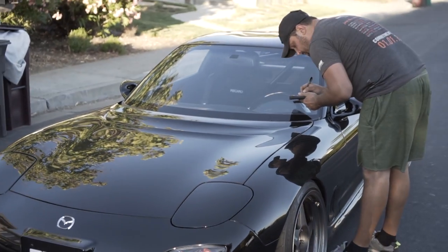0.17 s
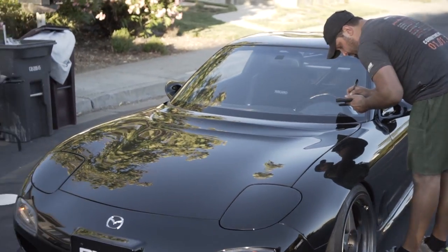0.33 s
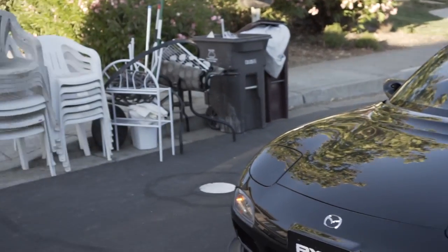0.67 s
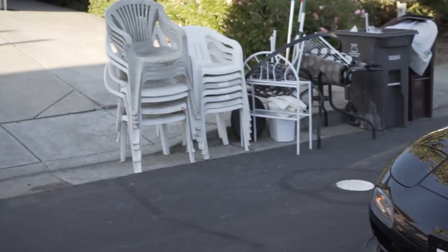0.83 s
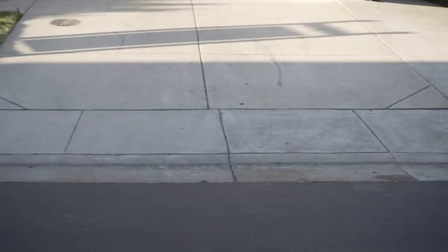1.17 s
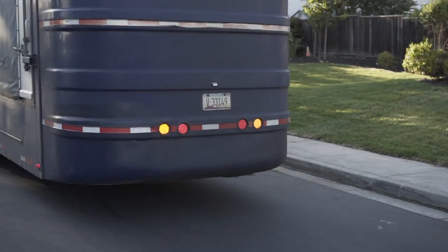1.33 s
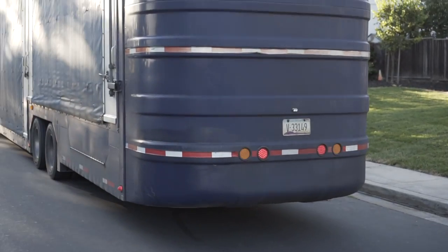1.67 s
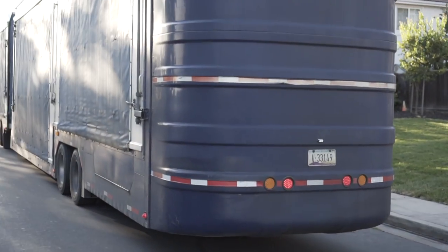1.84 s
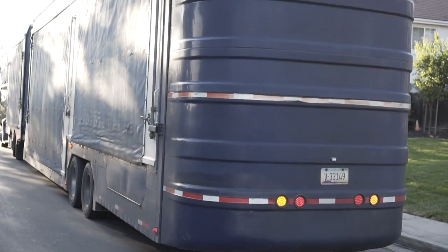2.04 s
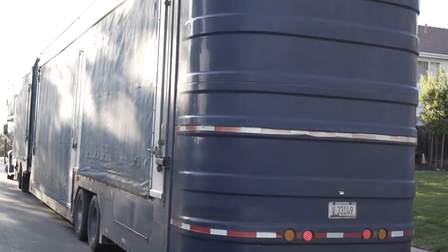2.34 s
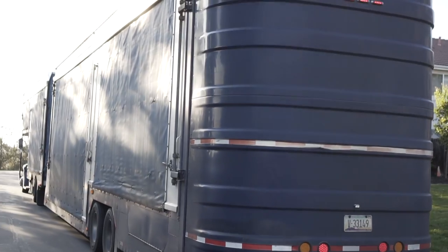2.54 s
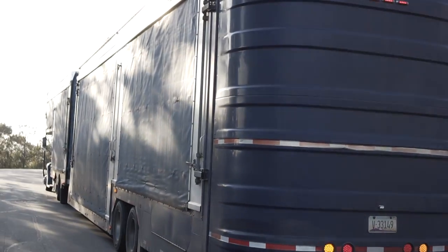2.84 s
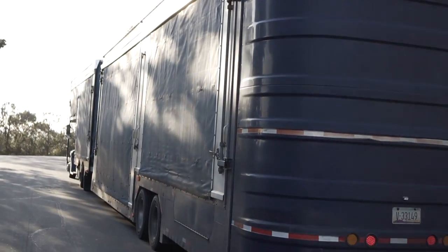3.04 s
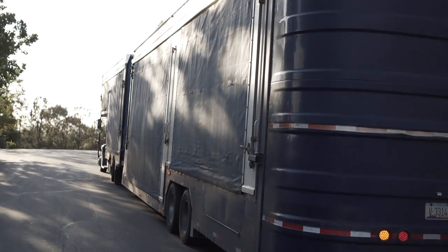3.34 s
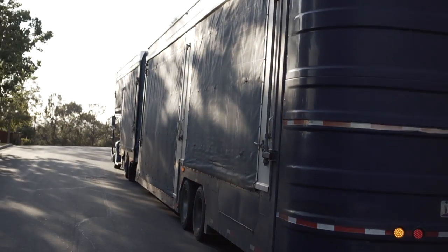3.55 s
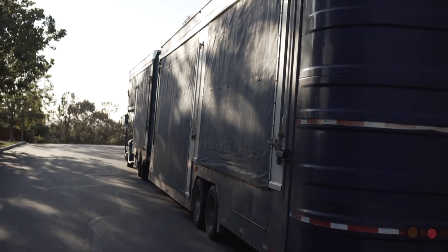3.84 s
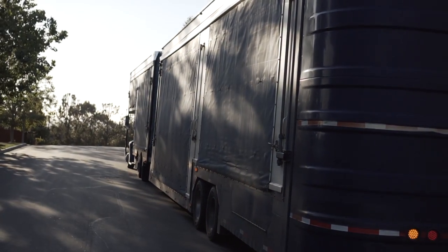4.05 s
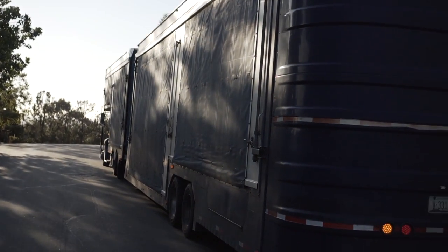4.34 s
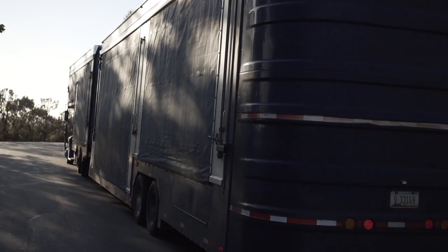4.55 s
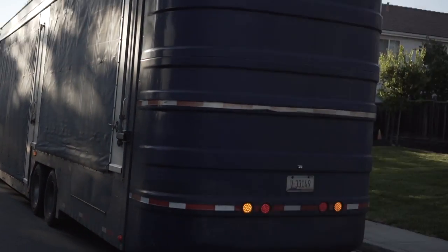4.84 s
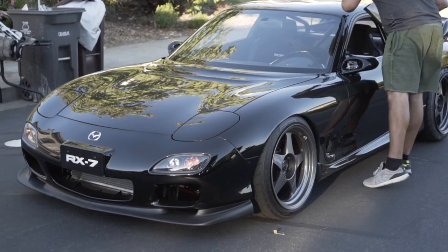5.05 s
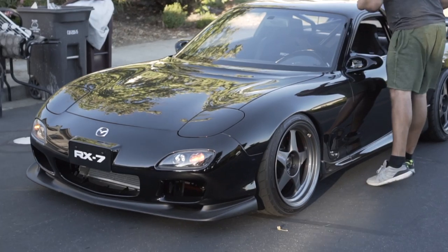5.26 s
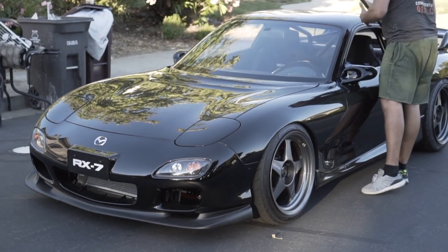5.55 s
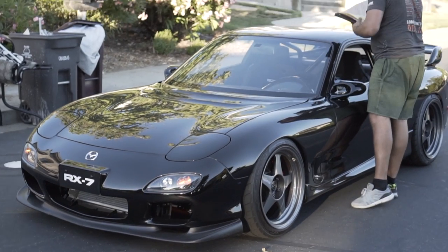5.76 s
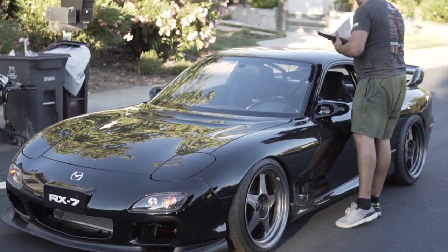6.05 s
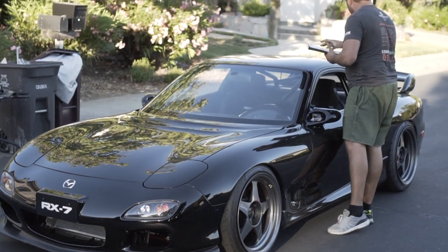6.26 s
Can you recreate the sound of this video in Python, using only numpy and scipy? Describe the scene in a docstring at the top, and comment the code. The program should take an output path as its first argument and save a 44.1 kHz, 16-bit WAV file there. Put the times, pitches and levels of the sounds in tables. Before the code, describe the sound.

A lumpy, throbbing car idle cuts to a clattering diesel truck running, then back again, as wind rumbles throughout.

```python
"""A rotary-engined sports car idles on a quiet street, its exhaust swelling in braps about seven times
a second: rotor firings boom in the pipe, gas burbles after them and the engine bay whirrs and hisses.
An abrupt cut moves to the back of a car transporter: diesel clatter, fan tones and a generator's hum,
the car still throbbing behind. A second cut returns to the car with a faint tick.
Wind rumbles on the microphone throughout."""
import sys
import numpy as np
from scipy import signal
from scipy.fft import rfft, irfft, next_fast_len
from scipy.io import wavfile
from scipy.ndimage import uniform_filter1d, minimum_filter1d

SR = 44100
rng = np.random.default_rng(int(sys.argv[2]) if len(sys.argv) > 2 else 0)


def wav_record(signal):
    """Record a signal, one row per channel, as 16-bit PCM in the file named by sys.argv[1]."""
    frames = np.transpose(np.atleast_2d(signal))
    bounded = np.clip(frames, -1, 1)
    # unit amplitude maps onto the largest positive 16-bit level
    quanta = np.round(bounded * 32767).astype(np.int16)
    wavfile.write(sys.argv[1], SR, quanta)


N = 282681
TIME = np.arange(N) / SR
TO_TRUCK_S, TO_CAR_S = 1.335, 5.087
LULL_FIRING_HZ = 57.6   # the rotary sags to this rate between braps

# Braps of the hunting idle beside the car. Each row: peak time in seconds, boom in relative dB,
# top firing rate in Hz, length in seconds, burble in relative dB.
BRAPS = [(0.0, -7, 60.4, 0.03, -35), (0.118, -11, 60, 0.073, -32), (0.282, -9.5, 63.6, 0.061, -35),
         (0.437, -8.5, 65, .085, -45), (0.584, -8.5, 63.7, 0.088, -27), (0.757, -11.5, 61, 0.11, -31),
         (0.88, -10.5, 61, 0.064, -25), (1.029, -11, 66, .06, -51), (1.169, -15, 67, 0.065, -38),
         (1.302, -12.5, 64, .06, -35), (5.202, -14, 56, 0.046, -25.5), (5.379, -18, 64, 0.059, -30.5),
         (5.51, -27.5, 60, 0.068, -27.5), (5.65, -12, 60, 0.084, -26.5), (5.801, -13.5, 63, 0.083, -27.5),
         (5.932, -11.5, 62, 0.061, -29.5), (6.091, -20, 58, 0.072, -30), (6.218, -15.5, 61, 0.056, -34),
         (6.373, -17, 61, 0.068, -30)]
# Exhaust pipe resonances. Each row: pitch in Hz, width in Hz, relative level in dB.
PIPE_MODES = [(125.3, 21.4, 29), (88, 35, -19), (201, 16, -27)]
# Moving around the bonnet. Each row: time in seconds, whirr in dB, hiss in dB.
BAY_LEVELS = [(0.0, -37, -45), (0.6, -38, -46.5), (1.15, -41.5, -48.5), (5.1, -38.5, -48.5),
              (5.4, -38.5, -49.5), (5.8, -37.5, -47.8), (6.41, -41.5, -51.5)]
# Tone colours of the car's noises. Each row: frequency in Hz, relative density in dB.
BURBLE_COLOUR = [(72, -17), (95, 5.5), (150, 3.5), (190, -1.5), (225, -2), (262, -8.5), (320, -6),
                 (390, -14.5), (550, -22.5), (900, -48)]   # exhaust gas
WHIRR_COLOUR = [(400, -7.5), (520, -6.5), (680, -10), (1100, -13.5), (1450, -17), (2100, -18.5),
                (2700, -18), (3450, -18.5), (4000, -26.5), (4600, -32)]   # engine bay
HISS_COLOUR = [(3700, -3), (4000, -3.5), (4450, -2), (5300, -7), (6000, -8), (6700, -6), (8300, -5.5),
               (9300, -11.5), (10200, -14.5), (12300, -13), (14000, -18), (15600, -23)]   # intake air

# Strength of the wind. Each row: time in seconds, relative level in dB.
BREEZE_LEVELS = [(0.0, -20), (0.45, -14.5), (0.7, -12), (1.22, -10.5), (1.42, -18.5), (1.62, -14.5),
                 (1.8, -26), (2.25, -20.5), (3.3, -19), (4.1, -22.5), (4.5, -15), (5.02, -23.5), (5.1, -11),
                 (5.75, -14), (5.97, -11), (6.41, -11)]
# Gusts that buffet the microphone. Each row: peak time in seconds, level in dB, length in seconds.
GUSTS = [(0.087, -21.5, 0.23), (0.656, -15.5, 0.11), (0.976, -16.5, 0.18), (1.25, -20, .15),
         (5.152, -16, 0.21), (5.38, -17.5, .12), (5.637, -17.5, 0.34), (5.9, -11, .15), (6.21, -15, .16)]
# Tone colours of the wind. Each row: frequency in Hz, relative density in dB.
PUSH_COLOUR = [(5, 2.5), (12, -1.5), (21, 1.5), (34, -10), (48, -21)]   # large eddies
BUFFET_COLOUR = [(38, 0), (52, 6), (66, 1), (85, 0.5), (130, -8), (300, -33)]   # small eddies

# Walking along the transporter. Each row: time in seconds, then clatter, air rush and fan in relative dB.
TRUCK_LEVELS = [(1.34, -36.2, -51.4, -40), (1.7, -35.3, -51.2, -33.5), (2.6, -33.6, -51.3, -30.5),
                (3.8, -32.6, -50.3, -29), (4.5, -31.3, -48.5, -27.7), (5.09, -31, -46, -26.7)]
# Tone colours of the diesel. Each row: frequency in Hz, relative density in dB.
KNOCK_COLOUR = [(200, -15.5), (260, -16.5), (330, -17), (440, -16.5), (800, -18.5), (1200, -18),
                (1400, -23), (2000, -24.5), (3000, -27.5), (3800, -33.5), (4600, -40)]   # combustion knocks
STACK_COLOUR = [(68, 0), (80, 5.5), (93, 9.5), (101, -21), (145, -5), (165, -4.5), (180, -3.5), (215, -9.5),
                (250, -16.5)]   # exhaust stack
RUSH_COLOUR = [(3900, -4.5), (4700, -0.5), (6000, -1.5), (8000, -7), (10000, -11), (11300, -15),
               (12600, -16), (14200, -21), (15600, -30)]   # cooling air
# Diesel block resonances. Each row: pitch in Hz, width in Hz, lift in dB.
BLOCK_MODES = [(313, 48, 5.5), (1150, 98, 1), (1605, 230, 3), (2890, 110, 1)]
# Fan, gears and belts turning with the diesel. Each row: pitch in Hz, relative level in dB.
FAN_TONES = [(190.8, 0), (381.8, -13), (531, -23), (571.5, -18.5), (675, -25), (764, -21), (841, -23),
             (1044, -23), (1143, -18.5), (1189, -25), (1218, -25), (1551, -26), (1717, -29), (1950, -29),
             (1980, -27), (2859, -27), (2930, -31), (2975, -31)]
# The generator's hum. Each row: multiple of its shaft speed, relative level in dB.
GENERATOR_ORDERS = [(1, -11), (2, 2.5), (3, -6)]


def from_db(db):
    """Decibels to gain."""
    return 10 ** (np.asarray(db) / 20)


def unit_rms(x):
    """Scale to unit power."""
    return x / np.sqrt(np.mean(x ** 2) + 1e-20)


def faders(rows):
    """Each dB column of a timed table as a gain at every sample."""
    times, *columns = np.transpose(rows)
    return [from_db(np.interp(TIME, times, db)) for db in columns]


def drift(rate_hz):
    """A slow random wobble with a spread of 1."""
    lowpass = 1 + (np.fft.rfftfreq(N, 1 / SR) / rate_hz) ** 2
    return unit_rms(irfft(rfft(rng.standard_normal(N)) / lowpass, N))


def coloured(x, colour):
    """EQ a sound to a colour, rolling off beyond its ends, at unit power."""
    hz, db = np.transpose(colour)
    size = next_fast_len(N)
    freqs = np.fft.rfftfreq(size, 1 / SR) + 1e-3
    skirts = np.minimum(1, np.minimum(freqs / hz[0], hz[-1] / freqs)) ** 4
    curve = from_db(np.interp(np.log(freqs), np.log(hz), db))
    return unit_rms(irfft(rfft(x, size) * skirts * curve, size)[:N])


def resonance(x, hz, width_hz):
    """Two-pole resonator with gain 1 at its peak."""
    radius = np.exp(-np.pi * width_hz / SR)
    poles = [1, -2 * radius * np.cos(2 * np.pi * hz / SR), radius ** 2]
    return signal.lfilter(np.array([1, 0, -1]) * (1 - radius ** 2) / 2, poles, x + 1e-18)


def levelled(x, span_s):
    """Ride the gain to hold the power at 1 over short spans."""
    size = int(span_s * SR)
    return x / np.sqrt(uniform_filter1d(uniform_filter1d(x * x, size), size) + 1e-12)


def turning(hz, wander, wander_hz):
    """Cycles completed by a shaft whose speed wanders."""
    return np.cumsum(hz * (1 + wander * drift(wander_hz))) / SR


def puffs(cycles, depth):
    """Noise that flares at each firing and fades until the next."""
    return rng.standard_normal(N) * (1 + depth * np.exp(-4 * (cycles % 1)))


def tone(cycles, level_db, waver_db):
    """A sine whose level wavers."""
    gain = np.sqrt(2) * from_db(level_db + waver_db * drift(13.0))
    return gain * np.sin(2 * np.pi * (cycles + rng.random()))


def swell(peak_s, length_s, rise_share=.48):
    """A rounded rise and fall that peaks at 1."""
    since = TIME - peak_s
    width_s = length_s * np.where(since < 0, rise_share, 1 - rise_share)
    return np.exp(-np.minimum((since / width_s) ** 2, 50))


def approach(db_per_s):
    """A steady fade up during the walk along the transporter, at gain 1 half way."""
    return from_db(db_per_s * (np.clip(TIME, TO_TRUCK_S, TO_CAR_S) - (TO_TRUCK_S + TO_CAR_S) / 2))


def near_idle(lull_boom_db, lull_burble_db):
    """Each brap lifts the firing rate and the boom; unburnt gas sputters out just after."""
    firing_hz, boom, burble = LULL_FIRING_HZ, from_db(lull_boom_db), from_db(lull_burble_db)
    for peak_s, boom_db, top_hz, length_s, burble_db in BRAPS:
        brap = swell(peak_s, length_s)
        afterboom = from_db(-12) * swell(peak_s + 0.053, length_s=0.12)
        sputter = swell(peak_s + 0.042, length_s=0.094)
        firing_hz = firing_hz + (top_hz - LULL_FIRING_HZ) * brap
        boom = np.hypot(boom, from_db(boom_db) * np.hypot(brap, afterboom))
        burble = np.hypot(burble, from_db(burble_db) * sputter)
    return firing_hz, boom, burble


def exhaust(firings, uneven_db, rough_share):
    """Uneven rotor firings ring the pipe; their second harmonic sits on its resonance and booms."""
    kicks = np.diff(np.floor(firings), prepend=-1) * from_db(uneven_db * rng.standard_normal(N))
    pipe = sum(from_db(db) * resonance(kicks, hz, width) for hz, width, db in PIPE_MODES)
    muffled = signal.sosfilt(signal.butter(2, [85, 210], "band", fs=SR, output="sos"), pipe)
    harmonic = np.sqrt(2) * np.cos(4 * np.pi * firings)
    return levelled(rough_share * unit_rms(muffled) + (1 - rough_share) * harmonic, span_s=0.019)


def gas_burble(firings):
    """Gas burbles out of the pipe with each firing."""
    return from_db(5.5) * levelled(coloured(puffs(firings, depth=2.6), BURBLE_COLOUR), span_s=0.04)


def engine_bay(firings):
    """Belts whirr and the intake hisses under the bonnet."""
    whirr_gain, hiss_gain = faders(BAY_LEVELS)
    whirr = coloured(puffs(firings, depth=0.23), WHIRR_COLOUR)
    hiss = coloured(puffs(firings, depth=0.26) * from_db(1.1 * drift(30)), HISS_COLOUR)
    return whirr_gain * whirr + hiss_gain * hiss


def wind(waver_db):
    """Large eddies push slowly on the microphone; smaller ones buffet it, most of all in gusts."""
    breeze, = faders(BREEZE_LEVELS)
    buffet_gain = from_db(-4) * breeze ** 1.356   # buffeting grows faster than the breeze
    for peak_s, db, length_s in GUSTS:
        buffet_gain = np.hypot(buffet_gain, from_db(db) * swell(peak_s, length_s))
    push_gain = breeze * from_db(waver_db * drift(4.6))
    push = levelled(coloured(rng.standard_normal(N), PUSH_COLOUR), span_s=0.12)
    buffet = levelled(coloured(rng.standard_normal(N), BUFFET_COLOUR), span_s=0.15)
    return push_gain * push + buffet_gain * buffet


def diesel(clatter_gain, rush_gain):
    """Knocks ring in the block and boom in the stack; cooling air rushes past."""
    firings = turning(hz=38.16, wander=0.0067, wander_hz=3.3)
    knocks = coloured(puffs(firings, depth=.2) * from_db(0.57 * drift(24)), KNOCK_COLOUR)
    ring = sum((from_db(db) - 1) * resonance(knocks, hz, width) for hz, width, db in BLOCK_MODES)
    block = from_db(1.27) * unit_rms(knocks + ring)
    stack = from_db(3.0) * coloured(puffs(firings, depth=0.96), STACK_COLOUR)
    air = from_db(-1.5) * coloured(rng.standard_normal(N) * from_db(0.65 * drift(28)), RUSH_COLOUR)
    return clatter_gain * (block + stack) + rush_gain * air


def cooling_fan():
    """Blade, gear and belt tones waver in pitch together with the shaft."""
    shaft_time = turning(hz=1, wander=0.00078, wander_hz=1.86)
    return sum(tone(hz * shaft_time, db, waver_db=-0.27) for hz, db in FAN_TONES)


def generator():
    """A small engine on the trailer drones unevenly on its first few orders."""
    gain = from_db(-29) * approach(db_per_s=1.7)
    turns = turning(hz=43.45, wander=0.0078, wander_hz=9.6)
    return gain * sum(tone(order * turns, db, waver_db=1.5) for order, db in GENERATOR_ORDERS)


def transporter():
    """Diesel, fan and generator grow louder as the listener walks along the transporter."""
    clatter_gain, rush_gain, fan_gain = faders(TRUCK_LEVELS)
    return diesel(clatter_gain, rush_gain) + fan_gain * cooling_fan() + generator()


def far_idle(braps_per_s, top_hz, jitter_s, uneven_db):
    """From behind the transporter the braps go on loosely in time, blurred into a throb."""
    beats = np.arange(TO_TRUCK_S, TO_CAR_S, 1 / braps_per_s)
    chance = rng.standard_normal(size=(64, 2))
    throb = sum(from_db(uneven_db * strong) * swell(beat_s + jitter_s * late, length_s=.11)
                for beat_s, (late, strong) in zip(beats, chance))
    firing_hz = LULL_FIRING_HZ + (top_hz - LULL_FIRING_HZ) * np.minimum(throb, 1)
    boom = from_db(-28) * approach(db_per_s=1.96) * np.hypot(1, throb)   # throb over a steady floor
    return firing_hz, boom


def cut_tick(level_db):
    """The cut back to the car makes a faint tick."""
    click = np.zeros(N)
    click[round(TO_CAR_S * SR)] = from_db(level_db)
    return signal.lfilter([1], [1, -.7], click + 1e-18)


def scene():
    """Car, transporter, car; each engine carries to the other's place, and the wind is everywhere."""
    opening = uniform_filter1d((TIME < TO_TRUCK_S) * 1., size=64)
    closing = uniform_filter1d((TIME > TO_CAR_S) * 1., size=64)
    at_car = opening + closing
    at_truck = 1 - at_car
    truck_gain = at_truck + from_db(-5.0) * opening + from_db(-17.5) * closing
    near_hz, near_boom, burble_gain = near_idle(lull_boom_db=-28, lull_burble_db=-32.5)
    far_hz, far_boom = far_idle(braps_per_s=6.8, top_hz=63.5, jitter_s=0.014, uneven_db=2.5)
    firings = turning(at_car * near_hz + at_truck * far_hz, wander=.035, wander_hz=14)
    boom_gain = at_car * near_boom + at_truck * far_boom
    boom = boom_gain * exhaust(firings, uneven_db=14.0, rough_share=0.56)
    car = boom + at_car * (burble_gain * gas_burble(firings) + engine_bay(firings))
    return (car + truck_gain * transporter() + wind(waver_db=1.5) + cut_tick(level_db=-15.5))[None]


def record(dry):
    """A fast limiter holds the peaks down to full scale; the top is cut steeply."""
    ducking = minimum_filter1d(1 / np.maximum(np.abs(dry), 1), size=600)
    limited = dry * uniform_filter1d(uniform_filter1d(ducking, size=300), size=300)
    cutoff_hz = 15700
    return signal.sosfilt(signal.ellip(10, .1, 80, cutoff_hz, fs=SR, output="sos"), limited)


dry = scene()
out = record(dry)
wav_record(out)
```